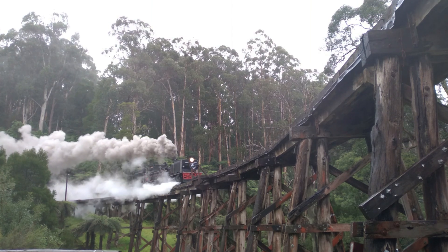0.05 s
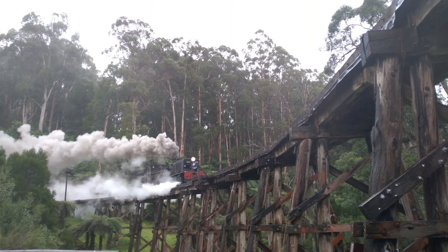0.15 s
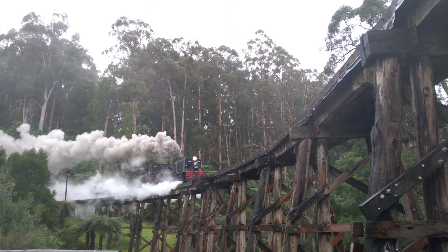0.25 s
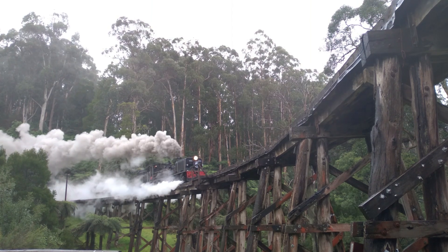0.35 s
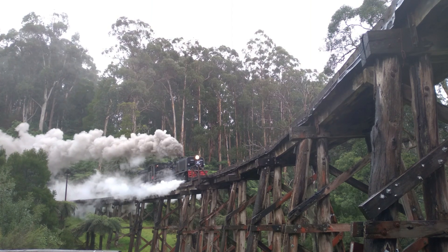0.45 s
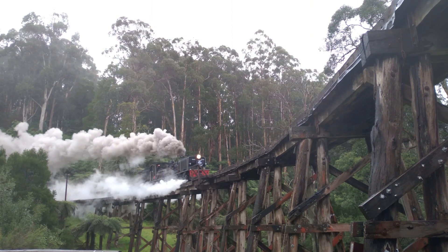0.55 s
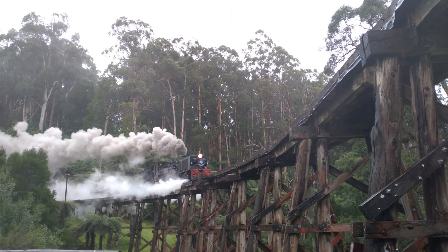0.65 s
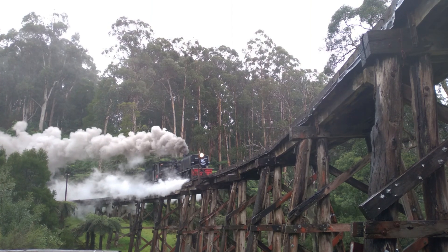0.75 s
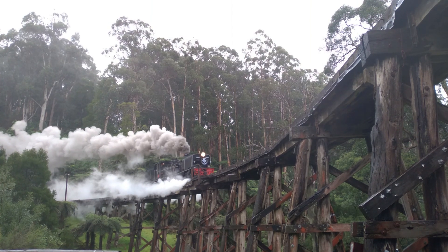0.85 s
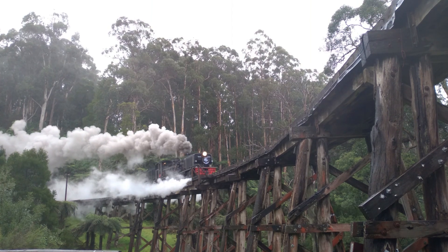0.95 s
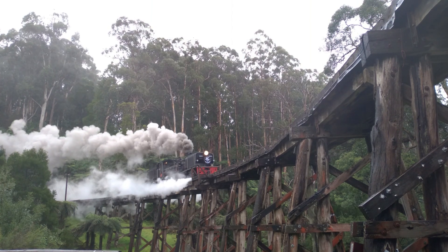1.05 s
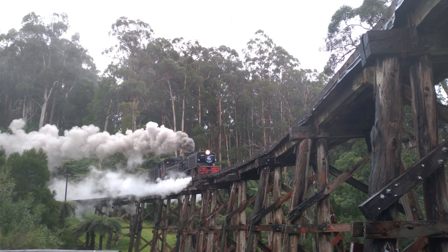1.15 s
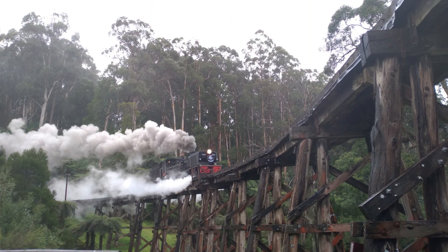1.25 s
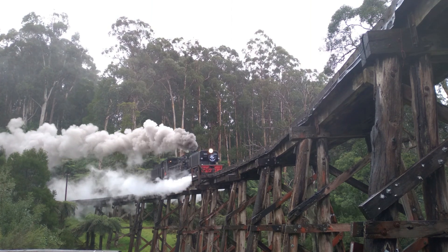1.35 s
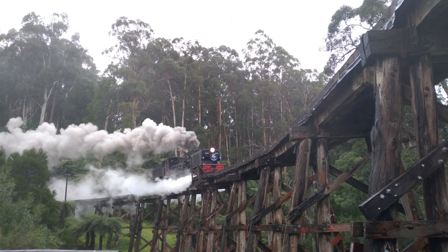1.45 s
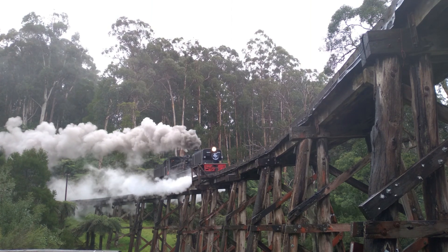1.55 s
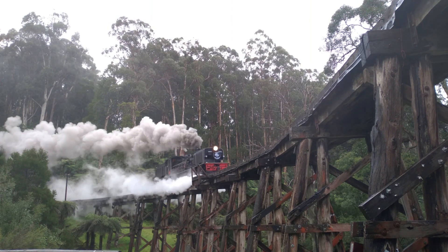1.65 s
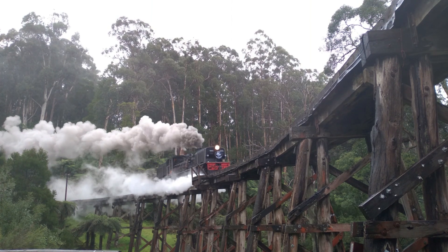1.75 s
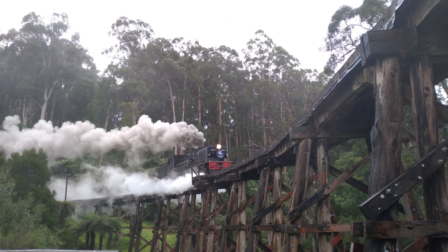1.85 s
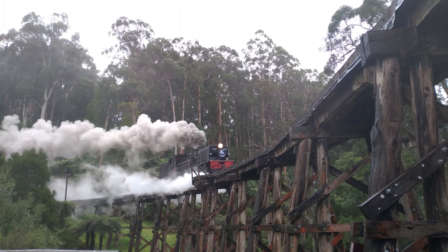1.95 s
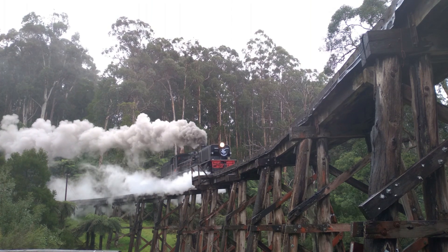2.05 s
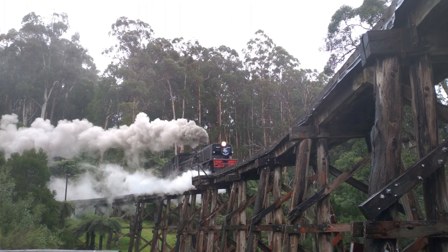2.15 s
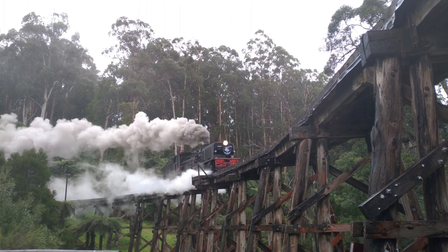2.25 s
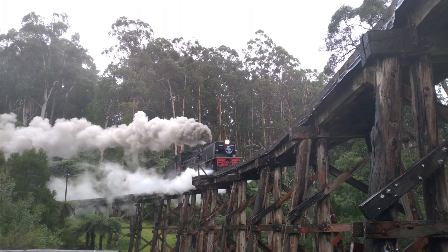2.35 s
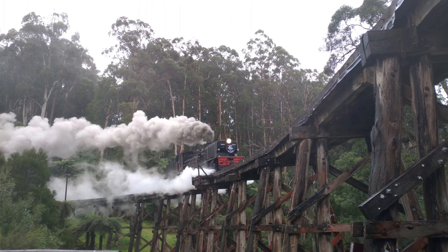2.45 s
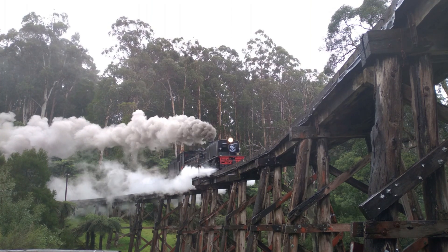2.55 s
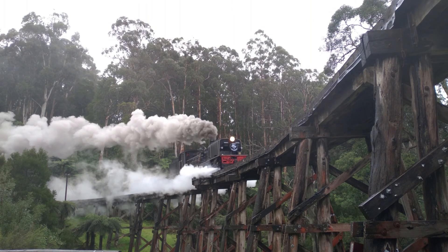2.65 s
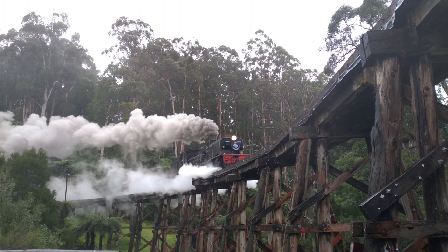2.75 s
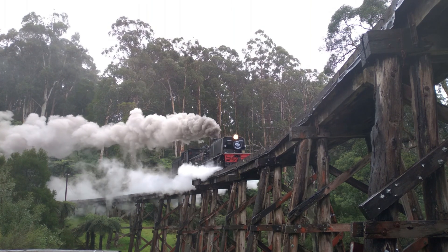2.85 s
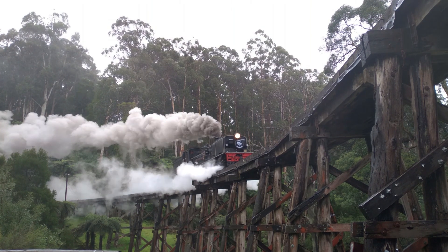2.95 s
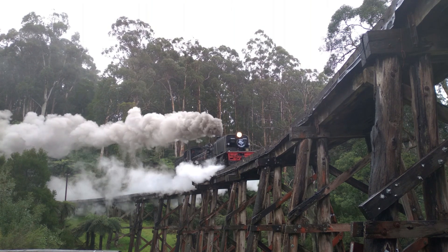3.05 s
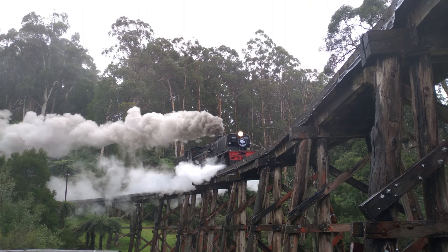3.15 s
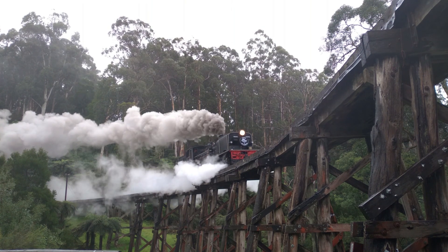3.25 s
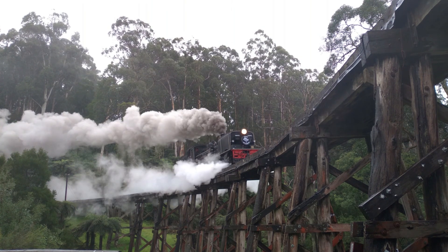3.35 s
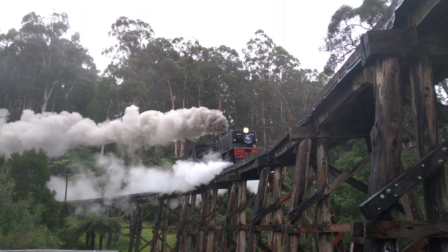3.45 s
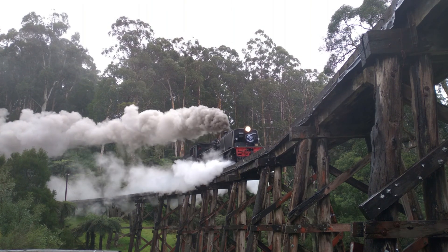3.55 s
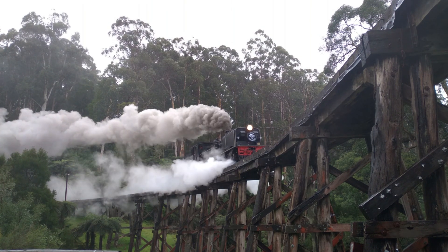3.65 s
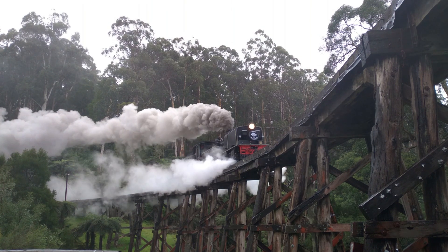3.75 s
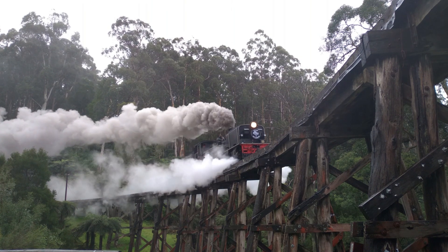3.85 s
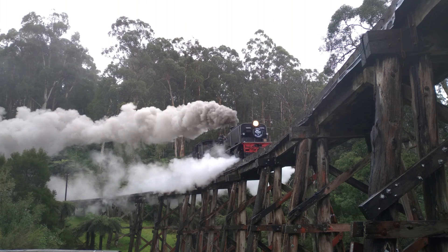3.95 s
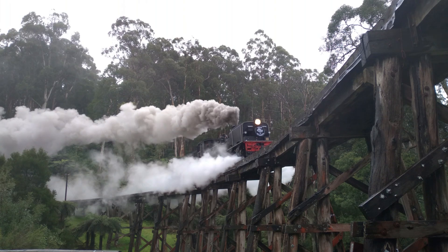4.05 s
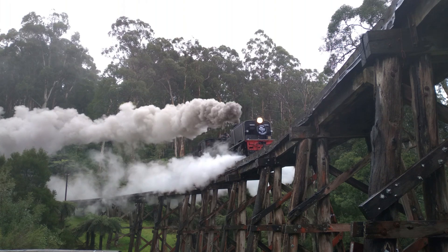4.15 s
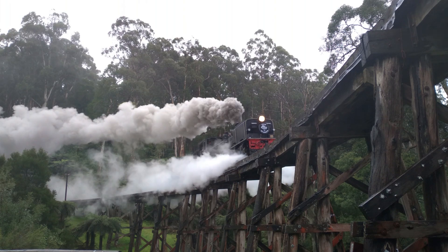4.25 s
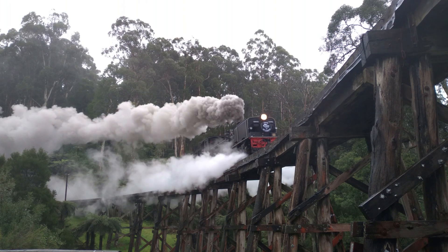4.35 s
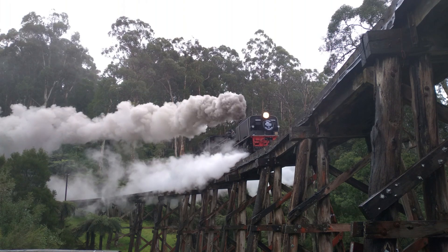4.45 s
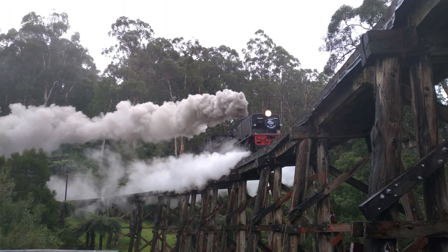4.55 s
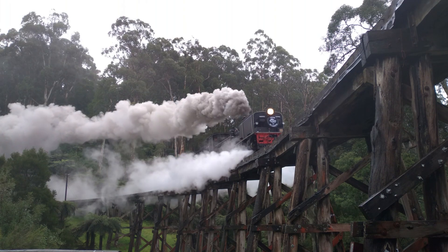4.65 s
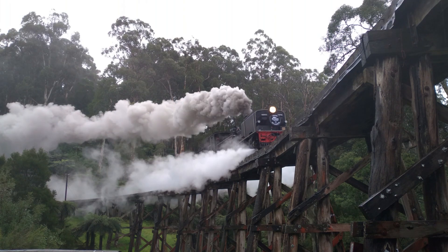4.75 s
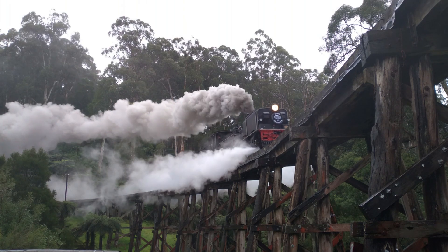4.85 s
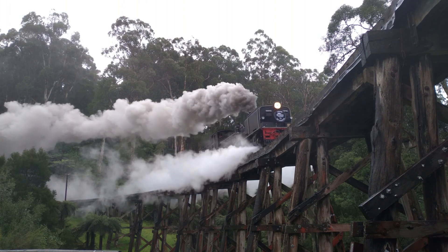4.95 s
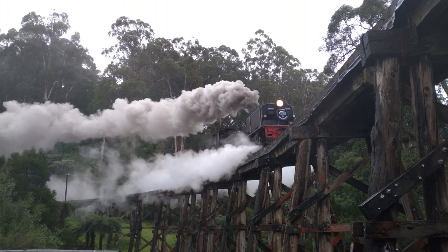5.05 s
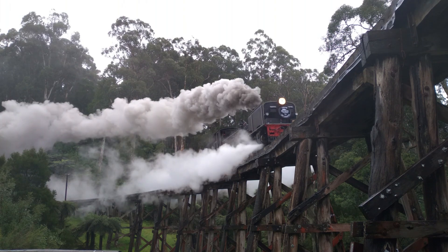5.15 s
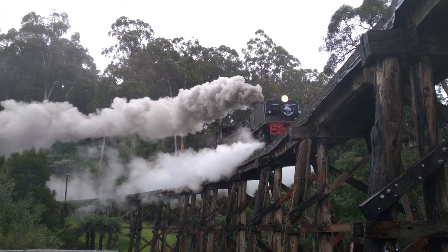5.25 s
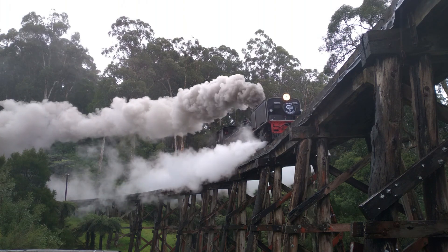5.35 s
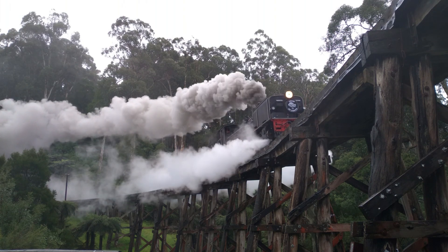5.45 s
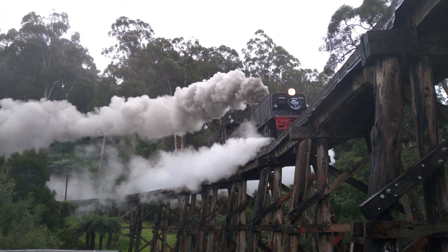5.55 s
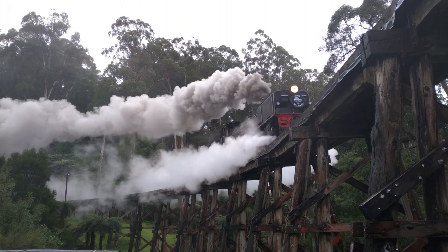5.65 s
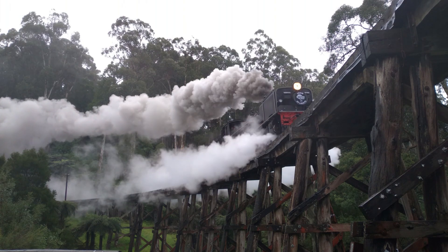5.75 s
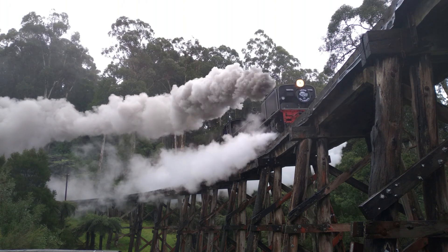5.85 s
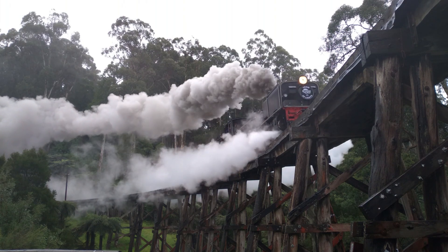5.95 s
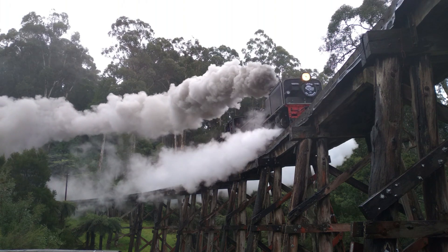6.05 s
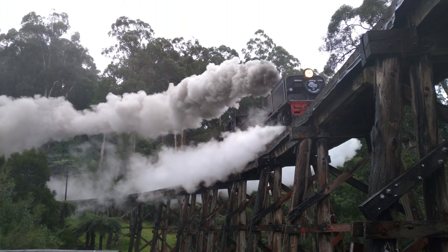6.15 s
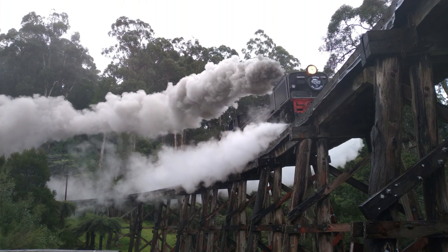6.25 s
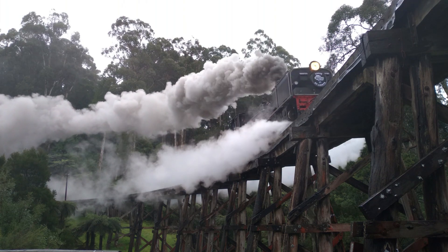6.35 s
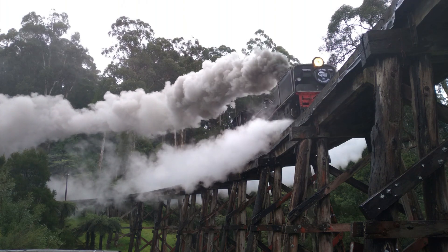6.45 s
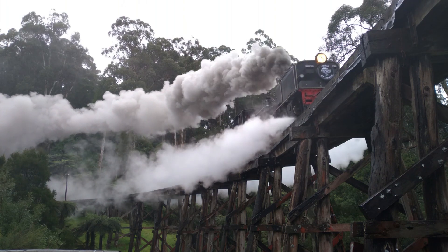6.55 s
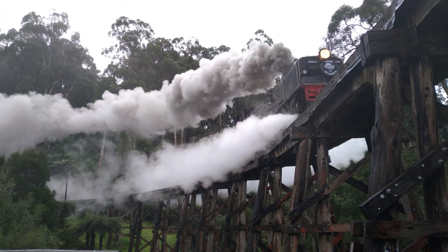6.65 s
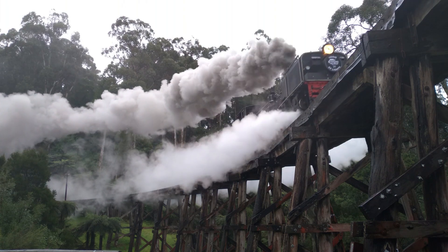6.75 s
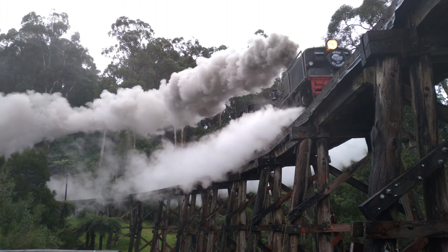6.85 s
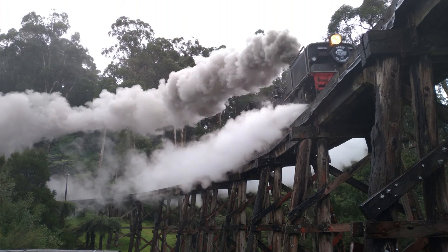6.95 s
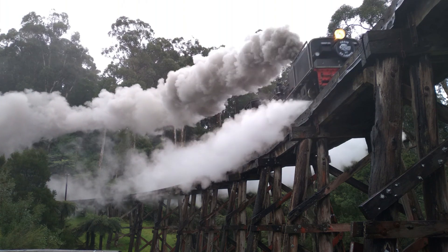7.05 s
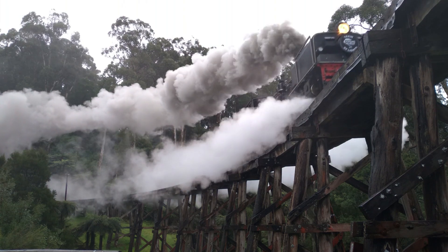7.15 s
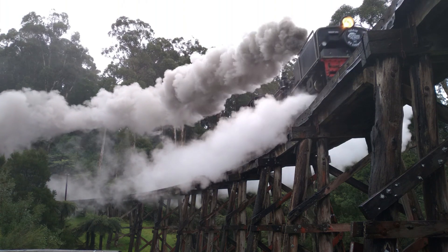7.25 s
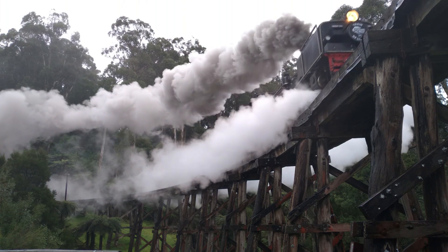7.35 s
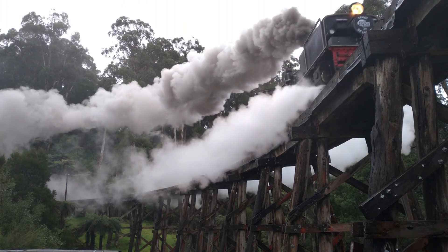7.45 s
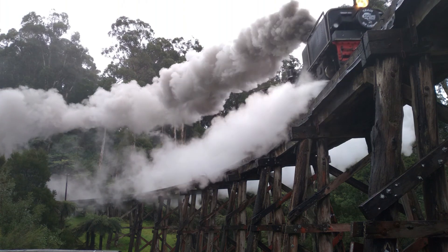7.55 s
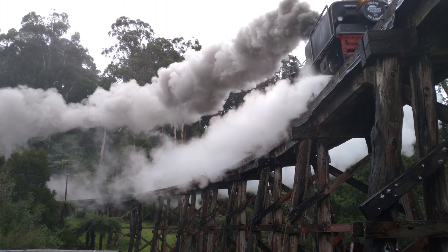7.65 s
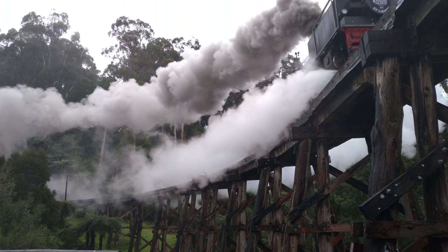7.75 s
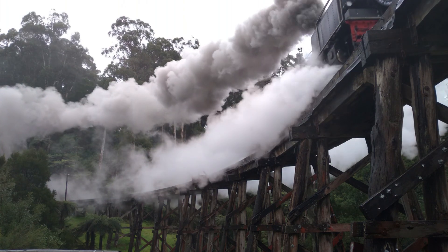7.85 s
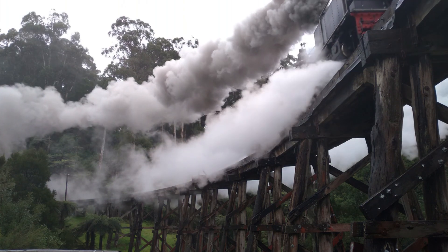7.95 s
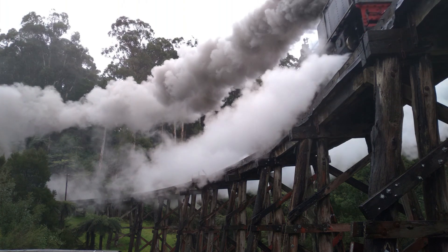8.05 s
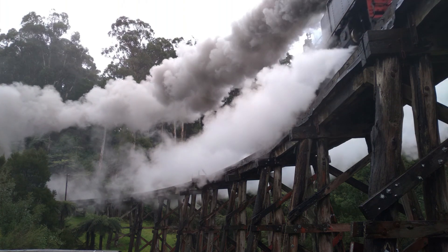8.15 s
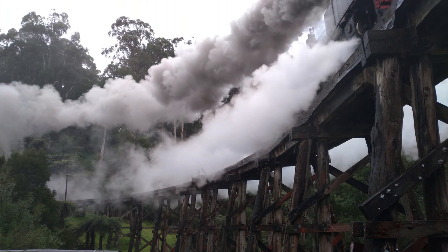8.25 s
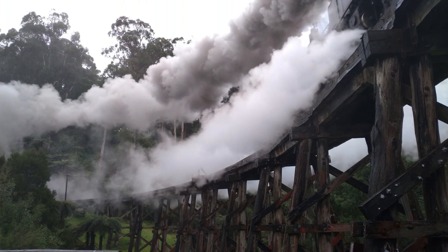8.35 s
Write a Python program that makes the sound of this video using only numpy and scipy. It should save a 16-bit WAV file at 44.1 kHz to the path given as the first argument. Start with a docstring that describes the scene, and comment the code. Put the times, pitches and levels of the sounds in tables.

```python
"""A small steam locomotive blows steam from open cylinder cocks, nearing a microphone pair from 52 m to 14 m.
The jet is noise in four bands that swells with each piston stroke; a close reflection sweeps a comb through it.
The chimney barks in resonant noise. On the timber trestle, bursts of shaped noise make the wheel knocks.
A drop ticks close by in damped modes. Behind lie the trestle's heaving rumble and the wheels' roar, in a
wet forest that scatters the sound."""
import sys
import numpy as np
from scipy import signal
from scipy.fft import rfft, irfft, next_fast_len
from scipy.io import wavfile
from scipy.ndimage import uniform_filter1d, map_coordinates

SR = 44100
rng = np.random.default_rng(int(sys.argv[2]) if len(sys.argv) > 2 else 0)


def materialize(psi):
    """Save the field psi as 16-bit PCM at rate SR to the path in sys.argv[1].

    A 1-D psi becomes a single channel; in a 2-D psi each row is a channel.
    """
    bounded = np.clip(np.atleast_2d(psi).T, -1, 1)
    quanta = np.round(bounded * 32767).astype(np.int16)
    wavfile.write(sys.argv[1], SR, quanta)


N = 370881
TIME = np.arange(N) / SR  # s
FREQS = np.maximum(np.fft.rfftfreq(2 * next_fast_len(N // 2 + 2048), 1 / SR), 1)  # Hz


# Jet bands, a row each for roar, hiss, sizzle and fizz: (steady blow at the starting distance, unscreened [dB],
# share of the screening felt [1], level gained per metre of approach as less air absorbs it [dB/m])
JET_BANDS = [(-38, 0.69, 0.0154), (-33.5, 0.95, -0.0006), (-35.5, 1.16, 0.0688), (-49, 1.33, 0.184)]
# Screening by the curve until the engine comes round it, then small changes in the jet's level:
# (time [s], level before each band's share [dB])
SCREENING = [(0, -11.5), (.3, -13), (1.1, -15.5), (1.8, -16), (2.1, -9), (2.42, -3.5), (3.15, 0.42),
             (6.2, -0.8), (7.2, 0.4)]
# Slow swings of the jet: (time [s], roar [dB], hiss [dB], sizzle [dB], fizz [dB])
JET_SWINGS = [(0, 1, 0.5, .7, 3), (1, 0.4, 1.9, .3, 2), (2.3, 0.14, 0.8, 1.5, 3.5), (3.0, 0.4, 2, .8, 2),
              (3.35, 0.6, 1.8, -1.2, -2), (3.75, 1.5, 2.2, 0.9, 3), (4.4, 0, -1, -0.4, .8),
              (4.9, -0.3, -0.2, 0, -1.5), (5.3, -1, -1.3, -.5, -2), (5.9, 0.1, -0.5, -1.5, -1.5),
              (6.7, -0.9, -2.2, -0.5, .8), (7.1, .3, 1.5, 0, 2), (7.8, .5, -1.1, 0.8, 0),
              (8.41, 0.5, 2, 1, 0.5)]
# Bearing as the engine crosses to the right: (time [s], left behind right before each band's share [ms])
BEARING = [(0, -.042), (2.3, .008), (4, .05), (5, .075), (6.7, .097), (7.1, .138), (8.41, .175)]
# Each jet band has its own share of the left-right lag: (share [1])
LAG_SHARES = (1, .92, 1.05, .8)
# Openness of the way to the microphones:
# (time [s], gain of the close reflection [1], share of power scattered by the forest [1])
OPENNESS = [(0, 0.34, 0.46), (1.5, 0.18, 0.82), (2.3, 0.6, 0.27), (3.5, 0.61, 0.22), (4.8, 0.9, 0.29),
            (6.3, 0.47, 0.2), (7.2, 0.66, 0.26), (8.41, 0.63, 0.2)]
# Jet across the two microphones: (frequency [Hz], left minus right [dB])
STEAM_BALANCE = [(140, 2.0), (210, 18), (330, 6), (500, -1), (770, 1.5), (1170, 0), (1790, 0), (2740, 2.1),
                 (4190, 1), (4900, 0), (5600, 2.5), (6500, 3), (7600, 4.1), (8100, 4.5), (8700, -2.5),
                 (9300, -5.5), (10500, -1), (15000, 1)]


def steam(flutter_db, own_flutter_db, ragged_db):
    """Turbulent jet, louder and brighter as it nears: each stroke adds a swell of power to the steady blow."""
    ragged_power = from_db(2 * ragged_db * drift(45))
    swells = strokes(swell=1.05, fade=0.98, squareness=2.37) * ragged_power
    sputter_db = flutter_db * drift(15.4)  # water in the steam shakes the whole jet at once
    screening_db, = in_time(SCREENING)
    lag_ms, = in_time(BEARING)
    approach_m = SPEED_M_PER_S * TIME
    direct, forest = 0, 0
    bands = zip(JET_BANDS, in_time(JET_SWINGS), LAG_SHARES, swells, steam_bands())
    for (blow_db, screened, air_db), swing_db, lag_share, swell, shape in bands:
        way_db = screened * screening_db + swing_db + air_db * approach_m
        flicker_db = sputter_db + own_flutter_db * drift(9.2)
        level = nearness() * from_db(blow_db + way_db + flicker_db) * np.sqrt(1 + swell)
        jet = level * rms_one(colour(rng.standard_normal(N), shape))
        direct = direct + np.array([delayed(jet, lag_share * lag_ms), jet])
        forest = forest + level * scattered(shape)
    reflection, share = np.clip(in_time(OPENNESS), 0, 1)
    heard = np.sqrt(1 - share) * reflected(direct, reflection) + np.sqrt(share) * forest
    return colour(hollowed(heard), pan(over_hz(STEAM_BALANCE)))


# One chuff per piston stroke: (time at its height [s], strength [dB],
# brightness, taken from the roar and added to sizzle and fizz [dB], relative length [1], relative chimney bark [dB])
CHUFFS = [(.055, 2, -2.5, 0.95, -14), (.4, -5, -4, 1.1, -5), (.705, 3, 1.5, 1.26, -16),
          (1.034, -4, -.5, 1.1, -6), (1.35, -8, 7, 1.2, -1), (1.743, -3.5, 5.5, 0.85, -16),
          (2.107, -1, 1, 1.2, -20), (2.45, -1.5, -2, 0.99, -9), (2.819, 1.5, -1, 1.07, -13),
          (3.19, -2.5, -3, 0.95, -18), (3.526, .5, 0, 0.85, -7), (3.883, -1, -2.5, 1.14, -8),
          (4.228, 0.5, -0.5, 0.93, -9), (4.57, 2, 1.5, 0.95, -7), (4.913, 3.5, 0, 0.98, -5),
          (5.267, 0.5, 0, 0.97, -2), (5.646, -0.5, -3, 0.94, -16), (5.98, -1.5, -2, 0.97, -12),
          (6.35, -1.5, -0.5, 0.87, -16), (6.685, 0, 1, 0.93, -3), (7.055, -1.5, -1.7, 1, -16),
          (7.405, 2, 1.5, 0.79, -10), (7.785, -2.5, -1, 1.1, -2), (8.135, 1, 1.5, 1.03, -1)]
# The cylinder ends blow in turn, one short and bright, one long and deep: (half length at the starting distance,
# before each chuff's own length and slopes [s], then over the steady blow, before each chuff's strength
# and brightness: roar [dB], hiss [dB], sizzle [dB], fizz [dB])
CYLINDER_ENDS = [(.066, -0.5, 1.5, 3.5, 6), (.082, 5, 4.5, 2, 2)]
SMEAR = 0.23  # the forest smears far chuffs: their length grows as this power of the distance


def strokes(swell, fade, squareness):
    """Power that the chuffs add to each jet band: each rises as the valve opens, holds, and falls as it shuts."""
    power = np.zeros((len(JET_BANDS), N))
    tilt = np.array([-1, 0, 1, 1])
    shortening = nearness() ** SMEAR
    for k, (s, db, bright_db, length, _) in enumerate(CHUFFS):
        half_s, *bands_db = CYLINDER_ENDS[k % 2]
        near = np.abs(TIME - s) < .5
        phase = (TIME[near] - s) / (half_s * length) * shortening[near]
        away = np.abs(phase) / np.where(phase < 0, swell, fade)
        peak_power = from_db(np.array(bands_db) + db + bright_db * tilt) ** 2
        power[:, near] += np.outer(peak_power, np.exp(-away ** squareness))
    return power


# Colour of the jet before its bass cut: (frequency [Hz], relative level per Hz [dB])
STEAM_COLOUR = [(250, -20), (500, -11.5), (900, -10), (1300, -6.5), (2000, -2), (2700, -1.2), (3300, -2),
                (4100, -1.5), (5000, 0.1), (5700, -0.9), (6500, -2.05), (7600, 0), (8100, 1.2),
                (8700, -1.5), (9300, -5), (10500, -16), (12000, -23), (15500, -31)]
# Where roar gives way to hiss, hiss to sizzle, and sizzle to fizz: (frequency [Hz])
STEAM_EDGES = [3255, 7060, 9950]


def steam_bands():
    """Roar, hiss, sizzle and fizz overlap at their edges and together make up the jet's colour."""
    below = [1 / (1 + (FREQS / hz) ** 22) for hz in STEAM_EDGES]
    shares = np.maximum(np.diff(below, axis=0, prepend=0, append=1), 0)
    bass_cut = 1 + (200 / FREQS) ** 8
    return from_db(over_hz(STEAM_COLOUR)) * np.sqrt(shares / bass_cut)


START_M, SPEED_M_PER_S = 51.7, 4.5  # distance at the start, speed of approach


def nearness():
    """Starting distance over present distance: the gain of a source that rolls closer at a steady speed."""
    return START_M / (START_M - SPEED_M_PER_S * TIME)


# Lag of the close reflection as from the starting distance; the gap grows as 1 / distance:
# (time [s], left microphone [ms], right microphone [ms])
REFLECTION_LAGS = [(0, 1.085, 1.05), (2.4, 1.077, 1.06), (3.4, 1.065, 1.039), (5.2, 1.056, 1.028),
                   (6.8, 1.06, 1.031), (8.41, 1.068, 1.05)]


def reflected(pair, reflection):
    """Direct sound and one close reflection at each microphone; their gap widens as the engine nears."""
    lags = in_time(REFLECTION_LAGS)
    echo = np.array([delayed(x, ms * nearness()) for x, ms in zip(pair, lags)])
    return (pair + reflection * echo) / np.sqrt(1 + reflection ** 2)


# Hollow in the hiss: (time [s], centre of the dip [Hz], dip [dB], ridge [dB])
HOLLOW = [(6.3, 3600, 1, 0.5), (7.05, 3200, -3.5, .5), (7.45, 3070, -2.5, 4.5), (7.85, 2850, -3.5, 1),
          (8.41, 2500, -4, 1.5)]
RIDGE_ABOVE_HZ = 970  # from the dip's centre up to the ridge's


def hollowed(x):
    """Close up the hiss turns hollow: a dip slides down through it, with a ridge just above."""
    hz, dip_db, ridge_db = in_time(HOLLOW)
    dipped = bell(x, hz, dip_db, width_hz=340)
    return bell(dipped, hz + RIDGE_ABOVE_HZ, ridge_db, width_hz=700)


def bell(x, hz, db, width_hz):
    """Raise or cut a narrow band around a gliding centre: shift it to zero, low-pass it, shift it back."""
    turn = np.exp(2j * np.pi * np.cumsum(hz) / SR)
    r = np.exp(-np.pi * width_hz / SR)
    band = 2 * np.real(turn * signal.lfilter([1 - r], [1, -r], x / turn))
    return x + (from_db(db) - 1) * band


# Chimney resonances: (frequency [Hz], width before the gain is squared [Hz], relative level [dB])
CHIMNEY = [(500, 160, 0), (780, 220, -3), (1000, 260, -3)]


def exhaust(level_db, rise_s, fall_s, rough_db):
    """With every stroke the chimney gives a hollow, ragged bark: noise through the resonances of its pipe."""
    envelope = np.zeros(N)
    for s, _, _, _, bark_db in CHUFFS:
        near = np.abs(TIME - s) < .5
        age = TIME[near] - s
        slope_s = np.where(age < 0, rise_s, fall_s)
        envelope[near] += from_db(bark_db) * np.exp(-(age / slope_s) ** 2)
    pipe = sum(from_db(db) * resonance(hz, width) ** 2 for hz, width, db in CHIMNEY)
    return from_db(level_db + rough_db * drift(60)) * nearness() * envelope * scattered(pipe)


# Wheels knocking on the track: (time [s], relative thud [dB], relative clack [dB])
KNOCKS = [(.04, -23.5, -22), (.44, -33, -26.5), (.805, -23.5, -25), (1.273, -23.5, -25),
          (1.319, -36, -24.5), (1.489, -26, -26), (1.53, -22.5, -25), (1.736, -27, -34),
          (1.994, -24.5, -31), (2.376, -30, -29), (3.099, -22.5, -33), (4.409, -21.5, -32),
          (4.922, -22, -31), (5.819, -23.5, -39), (6.101, -36, -20.5), (6.496, -27, -16.5),
          (6.745, -21.5, -29), (7.007, -22, -23), (7.253, -21, -18.5), (7.378, -25, -22.5),
          (7.728, -16, -16), (7.901, -25, -22), (7.966, -24, -22), (8.1, -22, -20), (8.133, -18, -14.5),
          (8.19, -31, -22)]
# Ring of the beams: (frequency [Hz], width before the gain is squared [Hz], relative level [dB])
BEAMS = [(130, 32, -2.5), (178, 50, -0.5)]
# Ring of the deck: (frequency [Hz], width before the gain is squared [Hz], relative level [dB])
DECK = [(215, 38, 3), (278, 84, -0.5), (368, 130, -3.5), (490, 94, -3.5), (820, 290, -12.5)]


def knocks(rise_s, thud_t60, clack_t60, level_db):
    """Each knock rings many timbers, as decaying resonant noise: a deep thud in the beams, a clack in the deck."""
    s, thud_db, clack_db = np.transpose(KNOCKS)
    age, out = TIME[:SR // 2], 0
    for body, peaks_db, t60 in ((BEAMS, thud_db, thud_t60), (DECK, clack_db, clack_t60)):
        envelope = np.zeros(N + SR)
        for start, db in zip((s * SR).astype(int), peaks_db):
            decay = from_db(db - 60 * age / t60)
            envelope[start:start + len(age)] += decay * (1 - np.exp(-age / rise_s))
        timber = sum(from_db(db) * resonance(hz, width) ** 2 for hz, width, db in body)
        out = out + envelope[:N] * evened(scattered(timber), window_s=0.033)
    return from_db(level_db) * out


# A drop striking something close by: (time [s], strength of the click before the modes [dB])
DROP_CLICKS = [(.0235, -25), (0.0354, -14.5)]
# Its tick: (frequency [Hz], level before the band filter [dB], time to fall by 60 dB [s])
DROP_MODES = [(1270, -11, 0.0087), (1520, -3.5, 0.011), (2600, 2.5, 0.0048)]


def drops(soft_hz):
    """Clicks set a few heavily damped modes ticking; a band filter softens them, louder on the left."""
    clicks, out = np.full(N, 1e-18), 0
    for s, db in DROP_CLICKS:
        clicks[int(s * SR)] = from_db(db)
    for hz, db, t60 in DROP_MODES:
        r, w = from_db(-60 / (t60 * SR)), 2 * np.pi * hz / SR
        mode = signal.lfilter([0, np.sin(w)], [1, -2 * r * np.cos(w), r * r], clicks)
        out = out + from_db(db) * mode
    soft = signal.butter(2, [900, soft_hz], "band", fs=SR, output="sos")
    return signal.sosfilt(soft, out) * pan(3.7)


# Colour of the trestle's rumble before its treble cut: (frequency [Hz], relative level per Hz [dB])
RUMBLE_COLOUR = [(12, -14), (21, -2), (29, -1), (36, -7.5), (48, 3), (68, -5.5), (100, -8.5), (130, -6),
                 (170, -11), (230, -13)]
# Booming resonances of the trestle: (frequency [Hz], width [Hz], relative level [dB])
BOOM = [(57.5, 6.2, 1), (83, 8.8, 3.5)]
# Rumble and boom across the two microphones: (frequency [Hz], left minus right [dB])
RUMBLE_BALANCE = [(30, -3), (55, 7.5), (85, 4), (160, 1.5)]
# Heave of the trestle as the load moves over it: (time [s], level before the shares below [dB])
HEAVE = [(0, -2), (.32, 3), (.48, -2.5), (.68, -4.5), (.92, 1.5), (1.35, -3), (1.55, -1), (1.85, -2.5),
         (2.38, -2.5), (2.62, 1.5), (2.9, -6), (3.15, 2.5), (3.45, -1.5), (3.65, 0.5), (4.35, -2.5),
         (4.62, -0.5), (4.8, 3), (5.15, 1.5), (5.45, 3), (6.2, 3), (6.88, 4.5), (7.08, -1), (7.3, 7.5),
         (7.6, 6), (7.8, 4), (7.97, 7), (8.41, 4.5)]
# Colour of the wheels' roar before its treble cut: (frequency [Hz], relative level per Hz [dB])
ROLL_COLOUR = [(110, -10.5), (180, 0), (300, -5), (480, -7.5), (750, -9.5), (1200, -14.5), (2500, -28)]
RUMBLE_DB, RUMBLE_FOLLOWS = -36, 0.53  # level without heave, share of the heave followed
BOOM_DB, BOOM_FOLLOWS = -38, 1
ROLL_DB, ROLL_NEARING = -42, 0.68  # level at the starting distance, power of the nearness gain


def rolling(flutter_db):
    """The trestle rumbles and booms in heaves under the load while the wheels roar on the rails."""
    dull = 1 / (1 + (FREQS / 230) ** 8)
    rumble_gain = from_db(over_hz(RUMBLE_COLOUR)) * dull
    boom_gain = dull * np.sqrt(sum((from_db(db) * resonance(hz, width)) ** 2 for hz, width, db in BOOM))
    wheel_gain = from_db(over_hz(ROLL_COLOUR)) / (1 + (FREQS / 2500) ** 4)
    heave_db, = in_time(HEAVE)
    rumble_level = from_db(RUMBLE_DB + RUMBLE_FOLLOWS * heave_db)
    rumble = rumble_level * evened(scattered(rumble_gain), window_s=.3)
    boom_level = from_db(BOOM_DB + BOOM_FOLLOWS * heave_db)
    boom = boom_level * evened(scattered(boom_gain), window_s=.18)
    roll_level = from_db(ROLL_DB + flutter_db * drift(8.9)) * nearness() ** ROLL_NEARING
    roll = roll_level * scattered(wheel_gain)
    return colour(rumble + boom, pan(over_hz(RUMBLE_BALANCE))) + roll * pan(1.0)


# Left-right likeness of sound scattered by the forest: (frequency [Hz], coherence [1])
SCATTER = [(60, 0.93), (150, 0.91), (300, 0.85), (600, 0.59), (1200, 0.3), (2500, 0.08), (5000, 0.12),
           (15000, 0.3)]


def scattered(gain):
    """Stereo noise arriving from all round: alike in the bass, mostly unrelated in the treble; rms 1."""
    alike = np.clip(over_hz(SCATTER), -.98, .98)
    mid, side = colour(rng.standard_normal((2, N)), gain * np.sqrt([1 + alike, 1 - alike]))
    return rms_one(np.array([mid + side, mid - side]))


def resonance(hz, width_hz):
    """Gain per frequency of one resonance, 1 on top."""
    return 1 / np.sqrt(1 + ((FREQS ** 2 - hz ** 2) / (FREQS * width_hz)) ** 2)


def evened(x, window_s):
    """Hold a sound near unit power, so that a level curve alone shapes it."""
    power = uniform_filter1d(np.mean(x ** 2, axis=0), int(window_s * SR))
    return x / np.sqrt(power + 1e-9)


def drift(rate_hz):
    """Slow random wander of rms 1: low-passed noise drawn at every 40th sample."""
    r = np.exp(-80 * np.pi * rate_hz / SR)
    slow = signal.lfilter([1], [1, -2 * r, r * r], rng.standard_normal(N // 40 + 2002))[2000:]
    return np.interp(np.arange(N) / 40, np.arange(len(slow)), rms_one(slow))


def delayed(x, ms):
    """Read a sound through a moving delay."""
    return map_coordinates(x, [np.arange(N) - ms * SR / 1000], order=3, mode="mirror")


def colour(x, gain):
    """Filter by a gain per frequency, with silence appended for the ringing."""
    size = 2 * (len(FREQS) - 1)
    return irfft(rfft(x, size) * gain, size)[..., :N]


def pan(db):
    """Left and right gains for a level difference, left minus right."""
    return from_db(np.array([[.5], [-.5]]) * db)


def in_time(rows):
    """Each column of a curve at every sample."""
    s, *columns = np.transpose(rows)
    return [np.interp(TIME, s, c) for c in columns]


def over_hz(points):
    """A short spectrum at every frequency, interpolated over log frequency."""
    hz, value = np.transpose(points)
    return np.interp(np.log(FREQS), np.log(hz), value)


def from_db(db):
    """Decibels to gain."""
    return 10 ** (np.asarray(db) / 20)


def rms_one(x):
    """Scale to unit power."""
    return x / np.sqrt(np.mean(x ** 2) + 1e-20)


def scene():
    """Steam and exhaust in front, knocks and a near drop among them, the rolling trestle behind."""
    jet = steam(flutter_db=0.45, own_flutter_db=0.94, ragged_db=1.04)
    chimney = exhaust(level_db=-44, rise_s=0.046, fall_s=0.062, rough_db=3.0)
    timbers = knocks(rise_s=0.0035, thud_t60=0.22, clack_t60=0.19, level_db=-8.0)
    trestle = rolling(flutter_db=0.94)
    return jet + chimney + timbers + drops(soft_hz=3400) + trestle


CUTOFF_HZ = 15750


def record(dry):
    """The highest peaks are rounded and the top is cut steeply."""
    rounded = dry / (1 + (dry / .85) ** 8) ** (1 / 8)
    return colour(rounded, 1 / (1 + (FREQS / CUTOFF_HZ) ** 300))


dry = scene()
out = record(dry)
materialize(out)
```